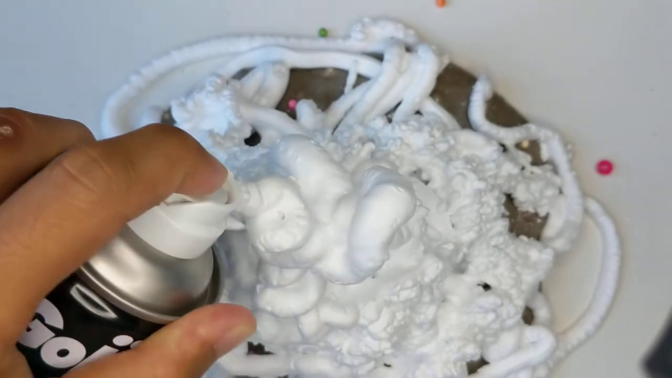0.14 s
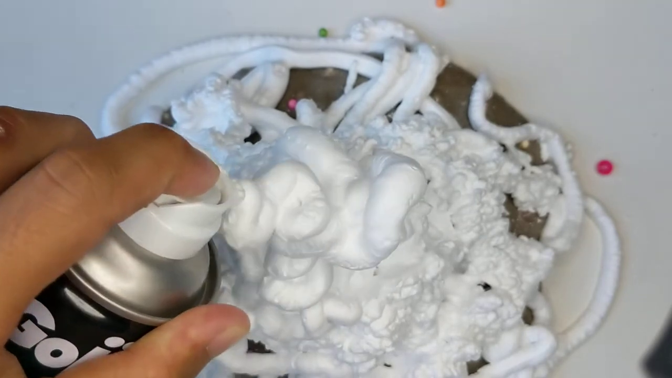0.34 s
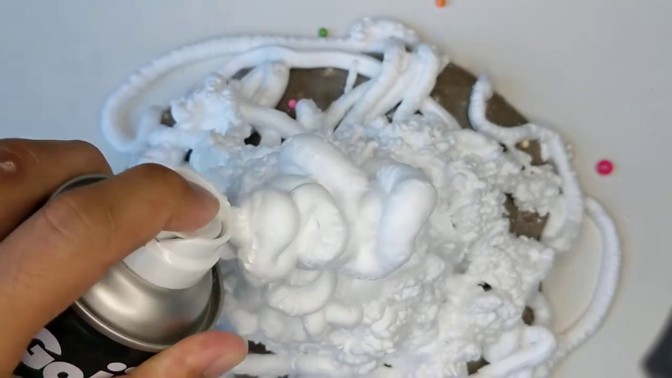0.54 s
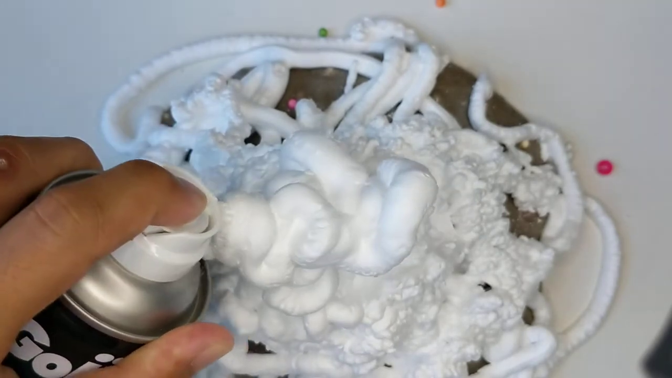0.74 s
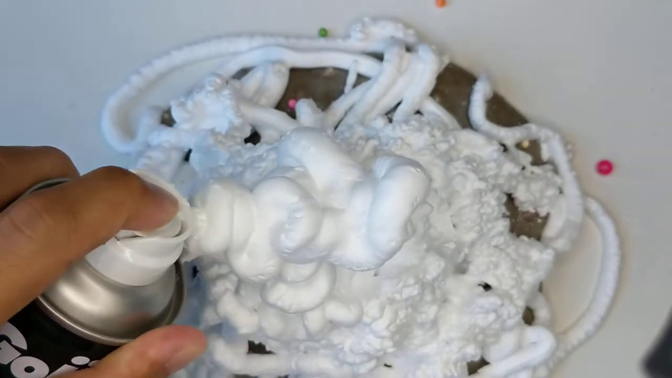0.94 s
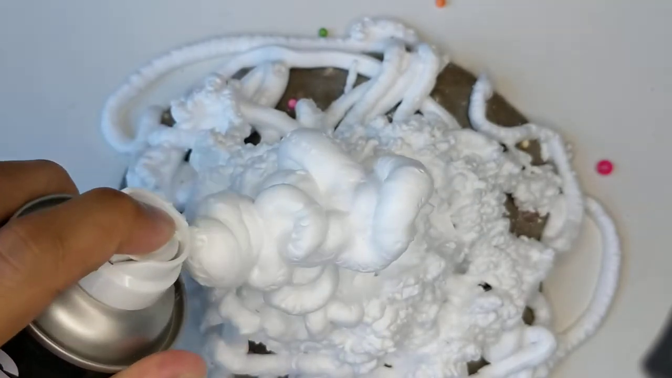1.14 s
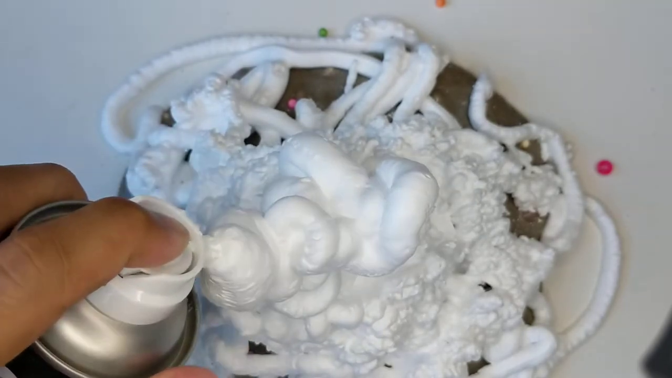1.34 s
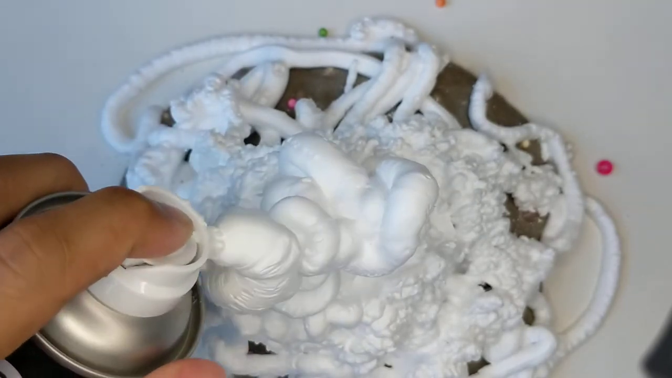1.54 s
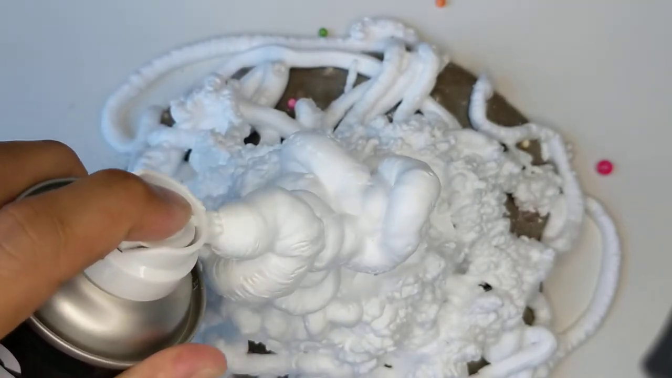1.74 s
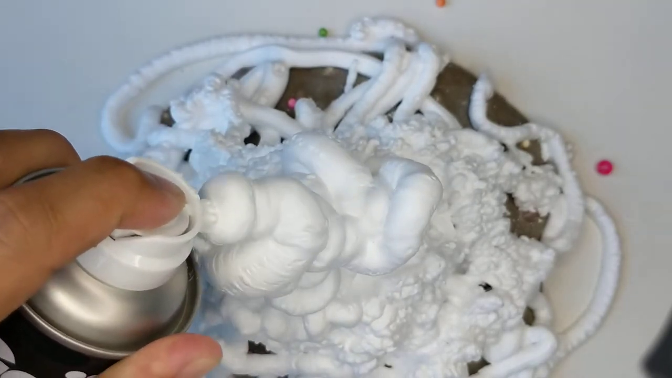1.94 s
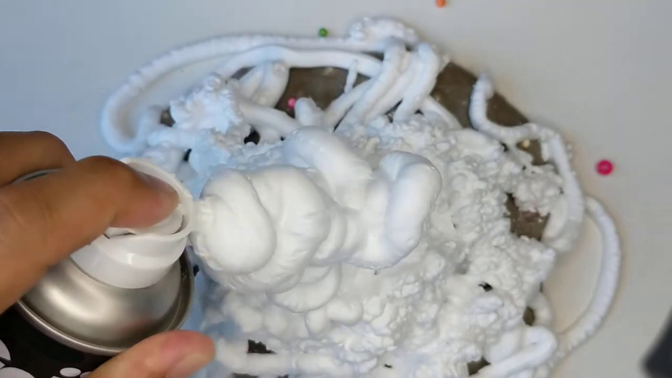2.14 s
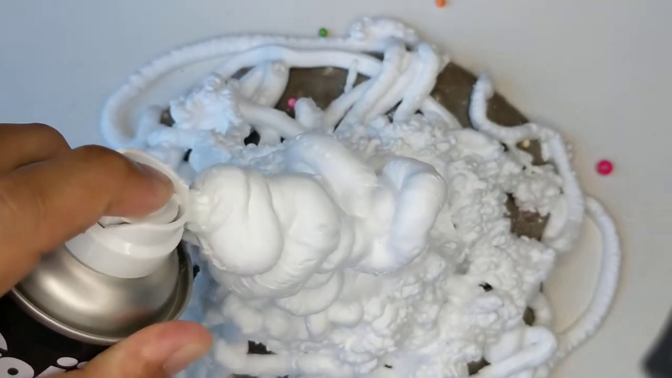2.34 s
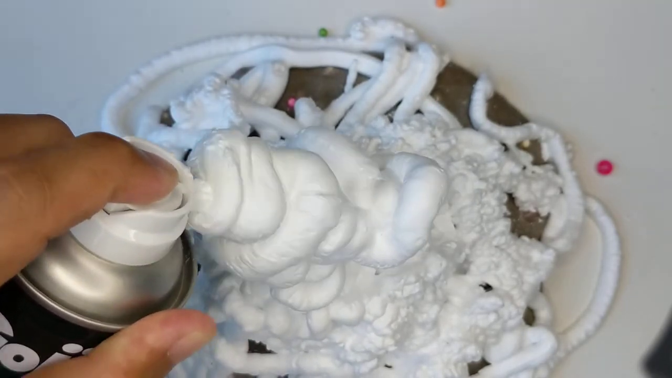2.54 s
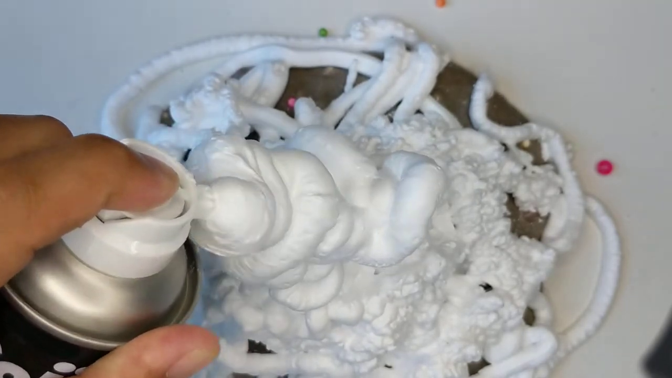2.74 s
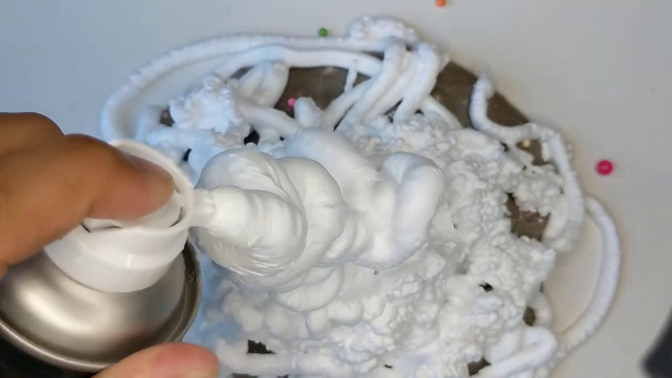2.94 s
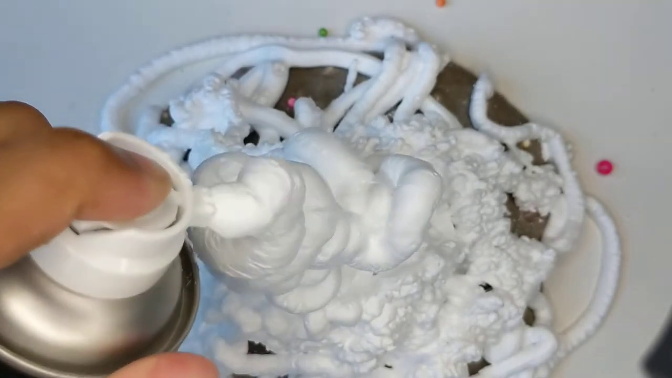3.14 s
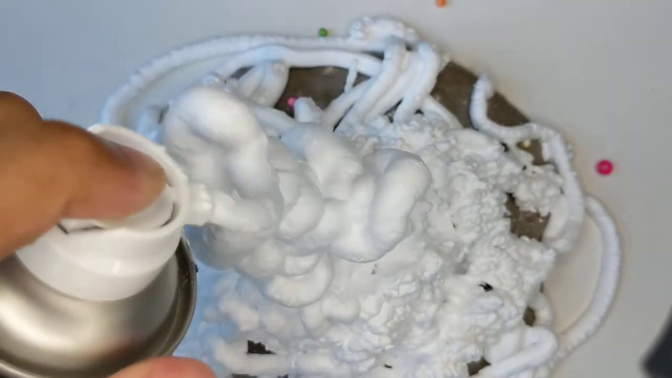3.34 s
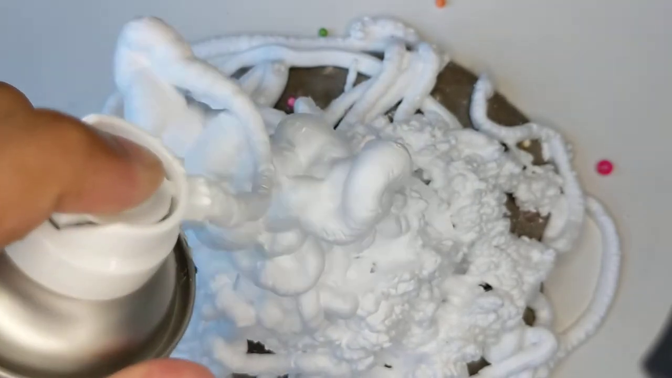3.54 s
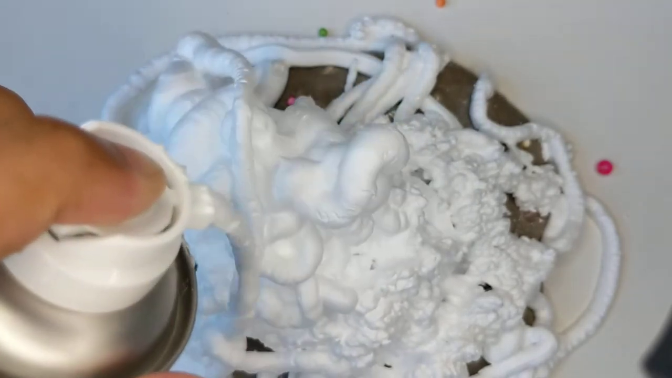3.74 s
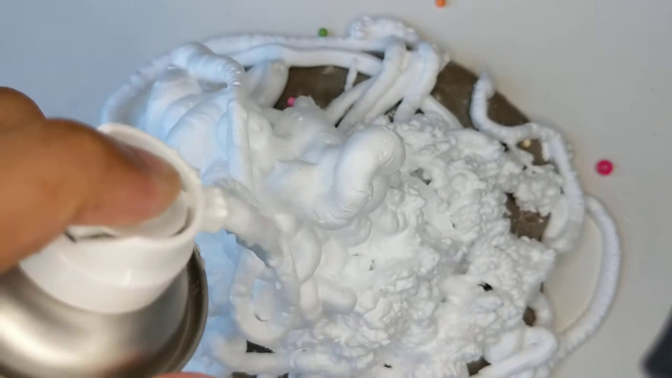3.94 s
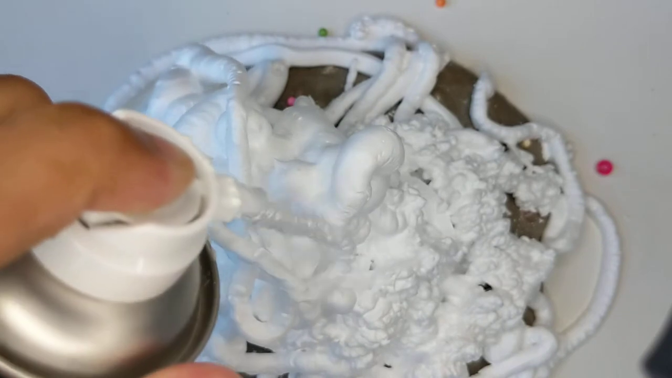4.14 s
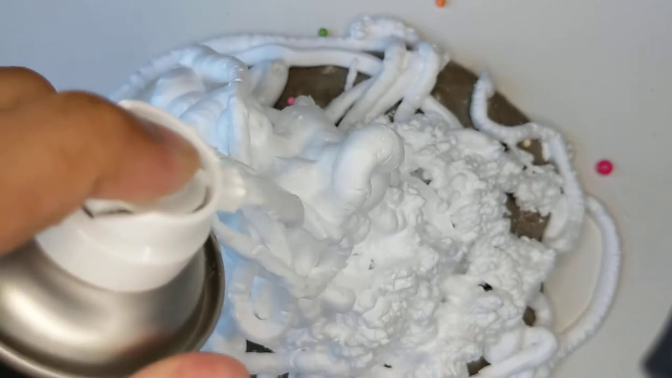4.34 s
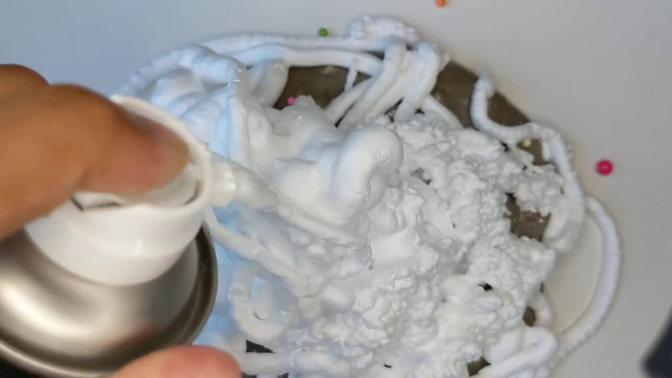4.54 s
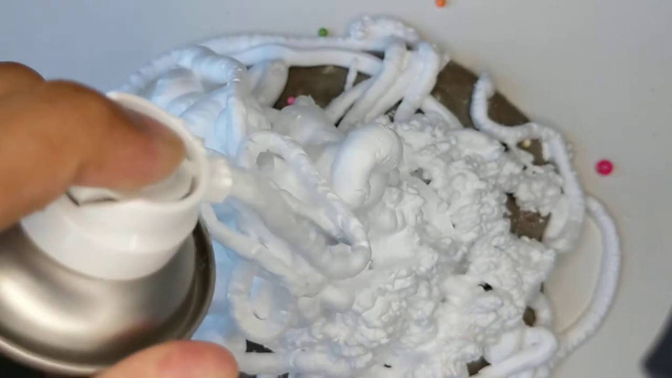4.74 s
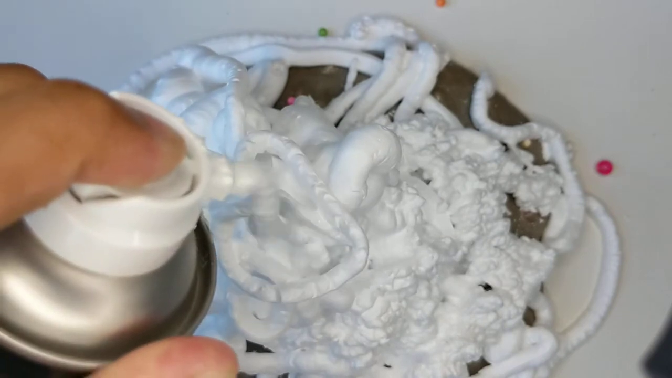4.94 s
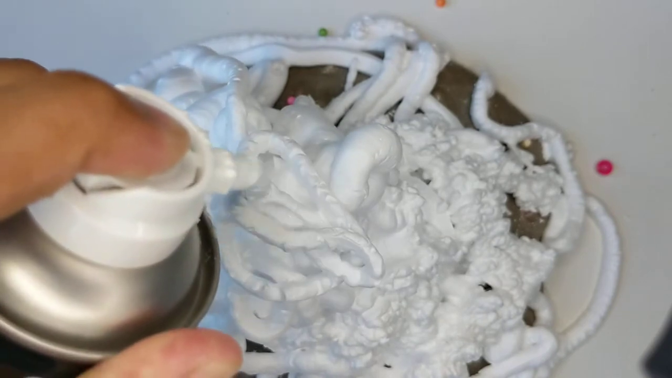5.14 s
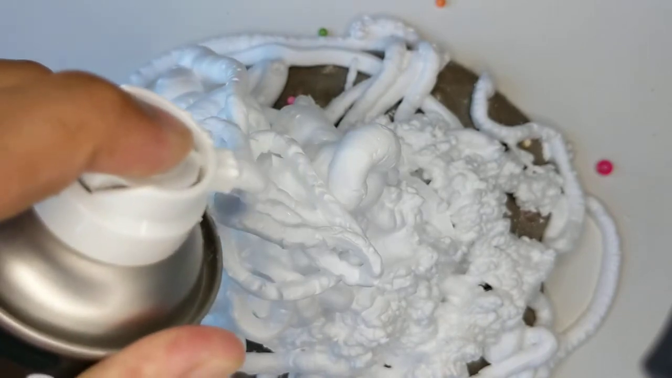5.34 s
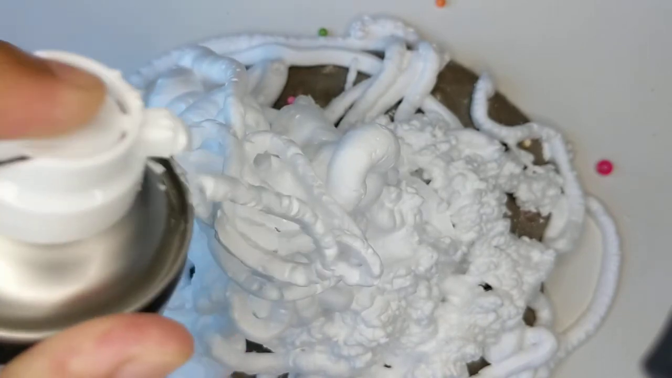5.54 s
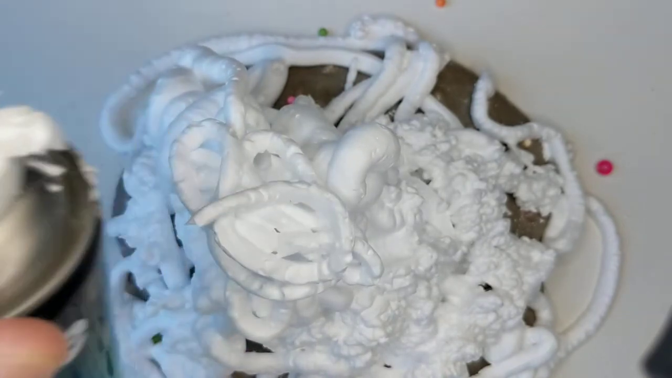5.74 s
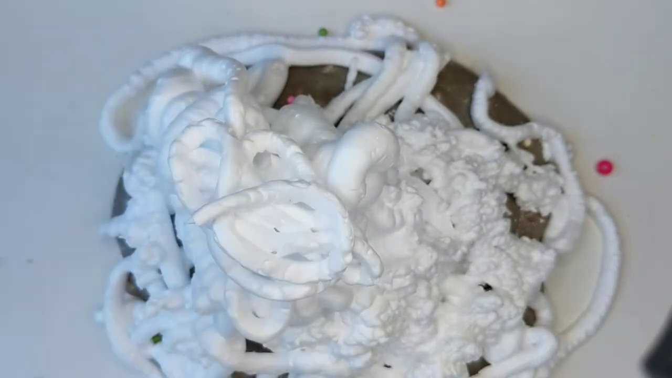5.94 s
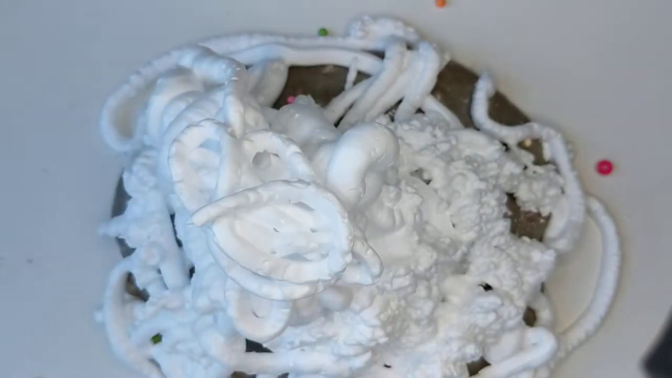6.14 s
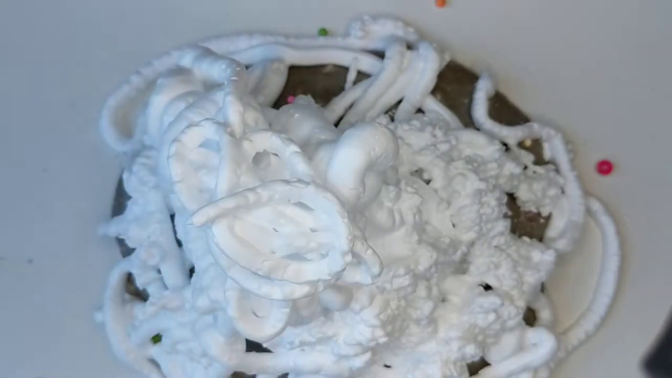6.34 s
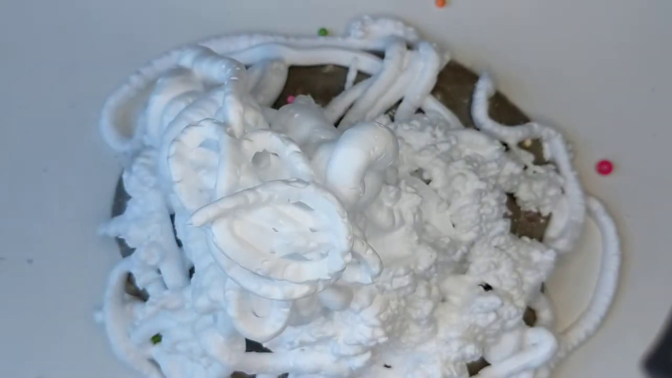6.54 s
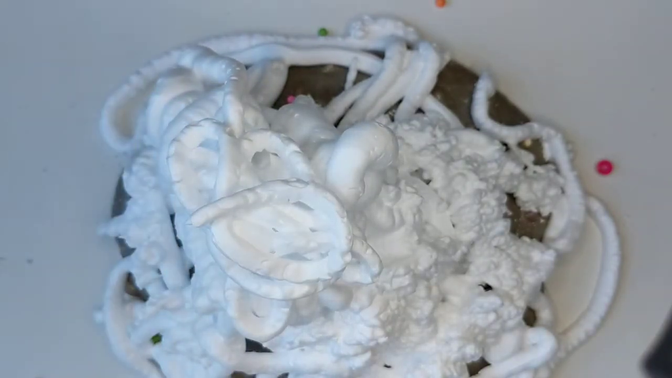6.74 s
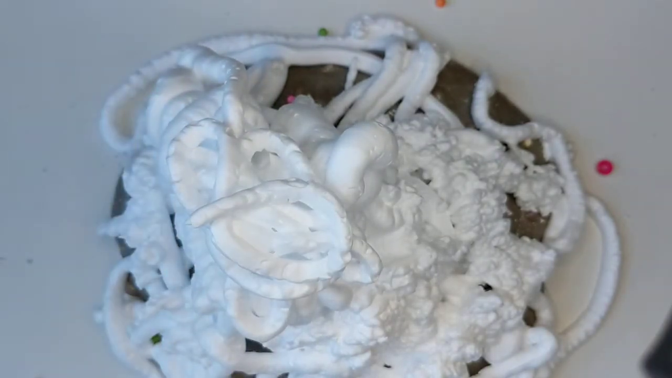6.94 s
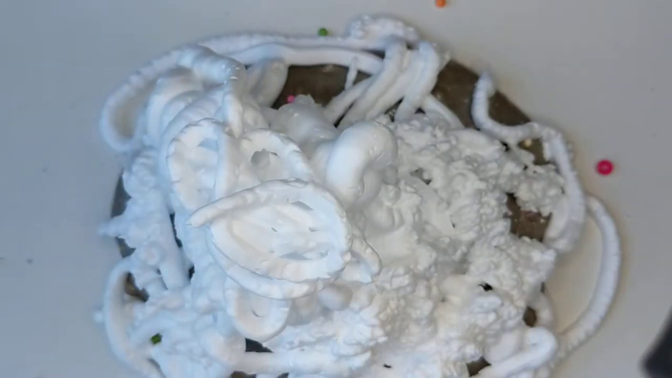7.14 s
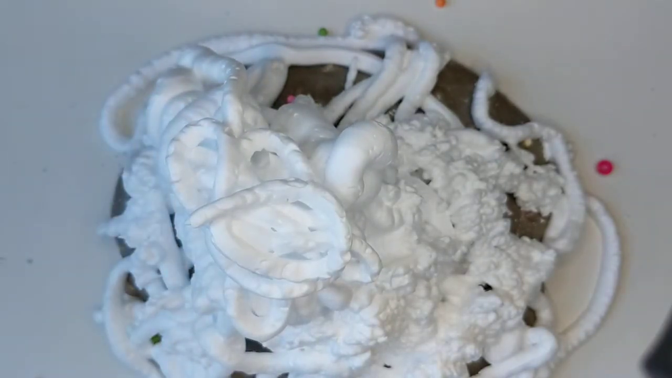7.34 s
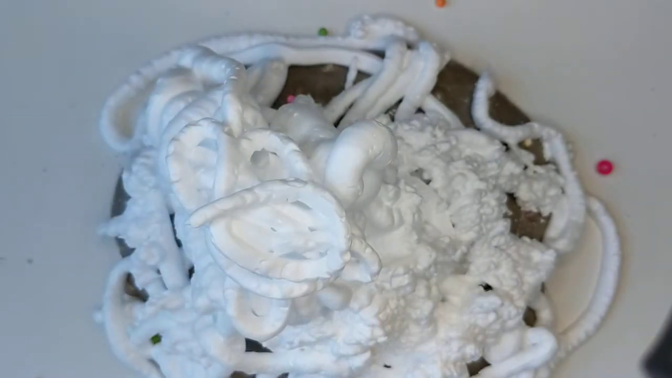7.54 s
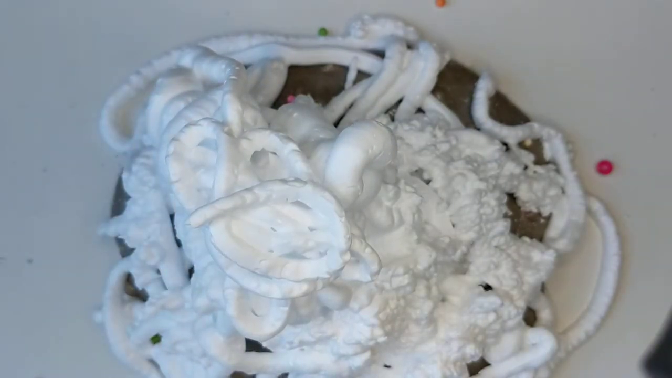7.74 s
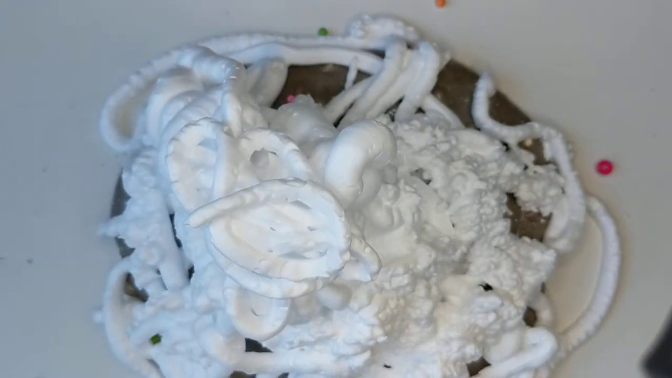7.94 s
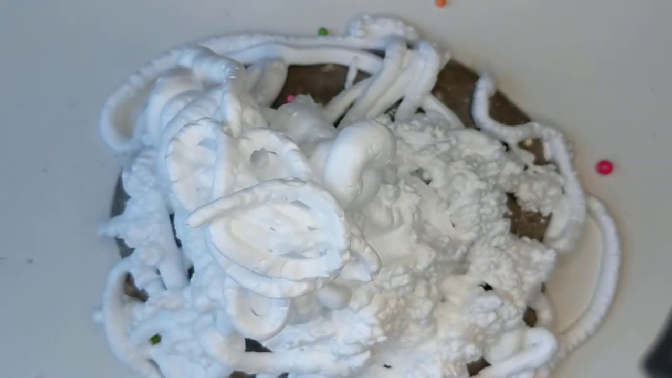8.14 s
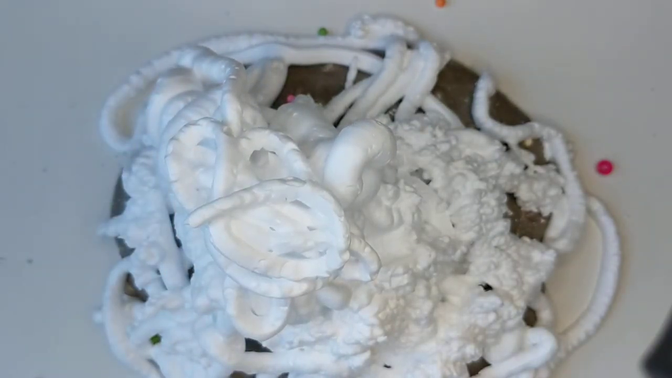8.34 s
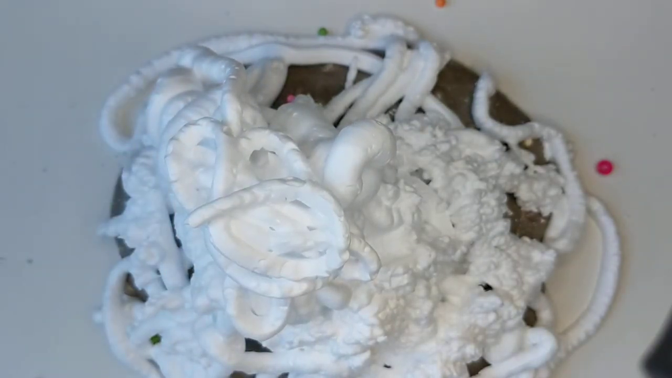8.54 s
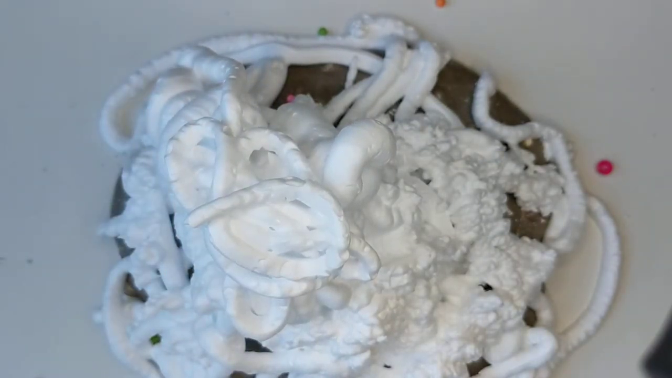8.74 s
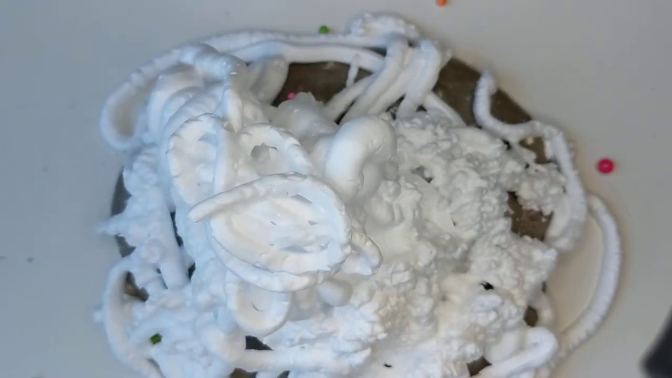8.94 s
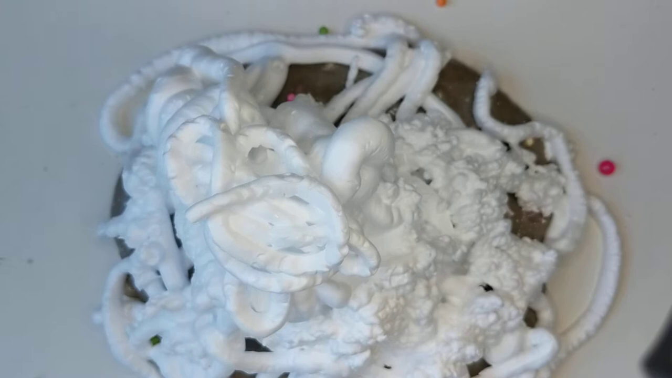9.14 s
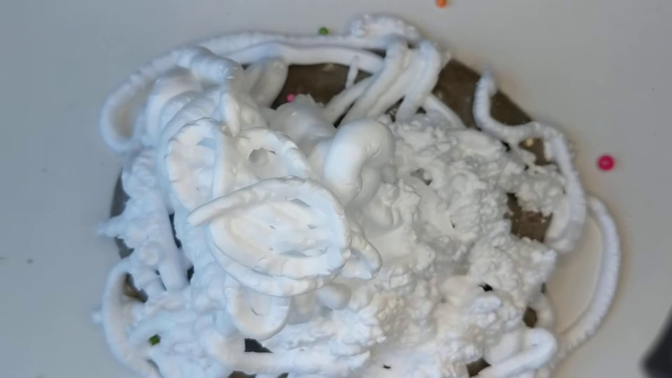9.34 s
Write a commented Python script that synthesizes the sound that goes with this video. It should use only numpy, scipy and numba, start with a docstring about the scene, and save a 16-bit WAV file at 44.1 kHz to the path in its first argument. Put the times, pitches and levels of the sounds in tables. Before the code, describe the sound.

Close up in a small room, an aerosol can hisses as shaving foam gurgles and crackles out of the spout, dotted with sharp bubble pops. A little past halfway the valve shuts, leaving low room noise with tiny squeaks and a few plastic ticks. Near the end the can lands with a short, dull rattling knock, followed by a light cloth rustle and soft thumps of a hand on the table.

```python
"""A small room: shaving foam is sprayed onto a heap on a table, close by.
Gas hisses at the valve; bubbles burst in the spout and ring it and the hollows of the growing blob.
The blob drops off and bares the spout; the valve shuts at 5.5 s. Then faint squeaks and plastic ticks,
the can is put down, cloth rustles and a hand thumps softly on the table."""
import sys
import numpy as np
from scipy import signal
from scipy.fft import rfft, irfft, next_fast_len
from scipy.io import wavfile
from scipy.ndimage import uniform_filter1d
from numba import njit

SR = 44100
rng = np.random.default_rng(int(sys.argv[2]) if len(sys.argv) > 2 else 0)


def pcm_store(signal):
    """Save signal as 16-bit PCM."""
    levels = np.round(np.clip(np.atleast_2d(signal), -1, 1) * 32767)
    wavfile.write(sys.argv[1], SR, levels.astype(np.int16).T)


N = 414085
JET_N = int(5.7 * SR)
T = np.arange(N) / SR

# room noise spectrum: (frequency [Hz], density [dB])
ROOM_SPECTRUM = [(15, -38), (25, -6.5), (194, -3), (435, -10), (525, -11), (766, -13), (1420, -18),
                 (1630, -19), (3860, -21.5), (5190, -22.5), (6440, -23.5), (8900, -27.5), (15700, -26)]
# spout coming bare of foam: (time [s], open share [0-1])
SPOUT_OPENING = [(0, 0.03), (2.75, 0.21), (3.1, 0.32), (3.4, 0.61), (5.15, 0.7), (5.3, 0.54), (5.6, 1)]
# valve resonances, main and above 10 kHz: (frequency [Hz], width [Hz], gain [dB])
HISS_MODES = [(7460, 1600, 5), (9460, 410, -0.5), (10000, 350, -11)]
HISS_TOP_MODES = [(10280, 390, 13.5), (11100, 520, 8), (12560, 550, 9), (13600, 1100, -17),
                  (16300, 3700, 1)]
# hiss above 10 kHz: (time [s], level [dB])
HISS_TOP_LEVELS = [(0, -65), (.9, -54), (1.3, -51), (2.1, -53), (3.14, -48), (3.6, -48.5), (5.5, -53)]
# foam flow: (time [s], sputter level [dB], rush level [dB])
FOAM_FLOW = [(0, -41.5, -36), (.3, -43.5, -37.5), (.46, -40, -37), (.74, -41, -37.5), (1.0, -42.5, -36),
             (1.12, -43, -37.5), (1.5, -44.5, -36.5), (1.9, -41.5, -36), (2.12, -37, -37),
             (2.3, -45, -36.5), (2.64, -44.5, -37.5), (3.14, -44.5, -35.5), (3.38, -41, -37),
             (4.05, -41, -38.5), (4.75, -42.5, -39), (4.92, -39, -38), (5.1, -43, -40), (5.27, -47, -41),
             (5.44, -41.5, -39.5), (5.5, -53, -49)]
# spout and foam resonances: (frequency [Hz], width [Hz], buried gain [dB], bare gain [dB])
SPOUT_MODES = [(3080, 990, 3.5, 2.5), (4144, 440, -0.5, 7), (4536, 660, 3, 6), (6480, 3900, -3.5, -15),
               (7080, 560, 4.5, 1), (8000, 1700, -15, -35)]
FOAM_MODES = [(703, 300, -10.5, 1.5), (961, 730, 1, -5), (1404, 930, 2.5, -3.5), (1704, 717, 3, 3.5),
              (2377, 510, -7.5, 0)]
# hollows in the foam: (time [s], duration [s], start pitch [Hz], end pitch [Hz], level [dB])
FOAM_HOLLOWS = [(0, .15, 2200, 2080, -37.5), (0, 0.91, 3290, 3200, -52), (0.064, 0.25, 7060, 6850, -44.5),
                (0.072, 0.37, 2285, 2060, -35.5), (0.202, 0.25, 2080, 1850, -37),
                (.31, 0.14, 4870, 4900, -41), (.333, 0.18, 7400, 7300, -46),
                (0.337, 0.38, 2360, 2420, -42.5), (0.412, 0.12, 2210, 2100, -38),
                (0.452, 0.26, 4950, 4780, -45), (0.522, 0.18, 1140, 1110, -41.5),
                (.53, 0.35, 1374, 1235, -41.5), (0.6, 0.34, 2180, 2100, -41),
                (0.702, 0.28, 1970, 1830, -45.5), (.72, 0.13, 2300, 2280, -42),
                (0.79, 0.36, 1214, 1066, -43.5), (.82, 0.31, 1690, 1540, -42), (.86, 0.21, 1930, 1800, -48),
                (0.893, 0.17, 6600, 6440, -42.5), (1.08, 0.44, 1556, 1424, -43),
                (1.12, 0.23, 1100, 1010, -46.5), (1.197, 0.19, 2330, 2150, -40.5),
                (1.343, 0.32, 2010, 1830, -44.5), (1.46, .2, 2260, 2170, -44),
                (1.498, 0.21, 1370, 1370, -42), (1.619, 0.27, 2230, 1790, -40.5),
                (1.768, 0.44, 1315, 1300, -44.5), (1.92, 0.14, 2320, 2190, -40),
                (1.922, 0.3, 2050, 1680, -46), (1.967, 0.21, 5200, 5200, -41),
                (2.2, 0.51, 1245, 1110, -42.5), (2.184, 0.41, 2160, 2150, -40.5),
                (2.31, 0.47, 4060, 3600, -47), (2.383, .36, 918, 920, -46), (2.386, 0.12, 5200, 5150, -43),
                (2.422, 0.31, 1970, 2020, -44.5), (2.545, 0.16, 5700, 5630, -42),
                (2.563, 0.33, 1500, 1440, -47.5), (2.68, .14, 5500, 5450, -48),
                (2.805, 0.52, 1880, 1780, -43), (2.88, 0.13, 5300, 5200, -46)]
# table under the spraying can: (frequency [Hz], width [Hz], gain [dB])
SHAKE_MODES = [(189, 20, -32), (239, 13.3, 10.5), (295, 78, 3), (350.5, 7.2, 3.5), (513, 40, 3)]
# big bubbles: (time [s], level [dB], thud offset [dB], crack pitch [Hz])
BIG_POPS = [(0.0154, -18.5, -19, 7140), (0.083, -36, -5, 7180), (0.099, -19, -19, 7430),
            (0.1717, -19, -16, 3010), (0.185, -33, -18, 7260), (0.2203, -11, -13, 7030),
            (0.276, -17.5, -11, 6450), (0.336, -25, -10, 4890), (0.4217, -12, -8, 7360),
            (0.476, -11, -9, 7200), (0.5263, -16.5, -4.5, 3320), (0.6804, -20, -4, 5110),
            (0.7043, -23, -13, 4780), (0.7239, -19, 0, 4820), (0.7672, -15.5, -14, 6800),
            (0.7953, -20, -16, 7460), (0.84, -30, -14, 6500), (0.8623, -23, -4, 6600),
            (0.8974, -21, -13, 4620), (0.92, -18, -12, 6470), (0.972, -14.5, -15, 6580),
            (1.0078, -16, -13, 6560), (1.03, -15, -6, 6610), (1.1922, -23, -5, 3380),
            (1.26, -30, -10, 3270), (1.3803, -23, -3, 7150), (1.488, -21, -13, 3000),
            (1.515, -14, -19, 7750), (1.548, -7, -28, 7340), (1.6182, -21, -9, 6960),
            (1.6748, -25, -4, 6170), (1.7624, -31, -8, 7490), (1.921, -31, -5, 7010),
            (1.9612, -15.5, -10, 6890), (2.0229, -16, -4.5, 4170), (2.0514, -14, -9, 4890),
            (2.1105, -12.5, -19, 3270), (2.2616, -20, -12, 6930), (2.2937, -18, -14, 6910),
            (2.3644, -38, -7, 4640), (2.384, -38.5, -8, 4490), (2.465, -26, -5, 3950),
            (2.485, -16, -18, 6360), (2.5032, -22, -12, 6160), (2.6513, -18.5, -8, 6050),
            (2.7182, -19, -14, 5500), (2.7393, -25, -15, 4770), (2.78, -18.5, -12, 5520),
            (2.8678, -16, -4.5, 4260), (2.9008, -30, -4, 6990), (2.933, -28, -8, 5260),
            (2.985, -31, -8, 4770), (3.255, -28, -4, 4270), (3.32, -20, 0.5, 4330),
            (3.359, -20.5, -19, 3070), (3.41, -24, -18, 4140), (3.4495, -21, -9, 3980),
            (3.4747, -19, -18, 4260), (3.5109, -29, -7, 4190), (3.536, -21.5, -5, 4230),
            (3.6127, -19, -6, 4220), (3.6402, -24, -14, 4420), (3.7015, -18, -9, 4230),
            (3.7207, -21.5, -3, 4470), (3.764, -18.5, -9, 4550), (3.811, -30, -5, 4550),
            (3.904, -27, -7, 4730), (3.9338, -22.5, -4, 4580), (3.9858, -31, -7, 4560),
            (4.0926, -31, -8, 4570), (4.1328, -16, -5, 4460), (4.1576, -15.5, -8, 4680),
            (4.2473, -23, 0.5, 4300), (4.297, -28, 2, 4620), (4.3168, -20, 0.5, 4330),
            (4.339, -25, -3, 4230), (4.4024, -21.5, -3, 4590), (4.4338, -17, -7, 4280),
            (4.472, -26, -4, 4220), (4.585, -20, -1.5, 4240), (4.6458, -21.5, -8, 4580),
            (4.661, -24, -8, 4550), (4.711, -20, 0, 4220), (4.754, -28, -6, 4160), (4.7871, -20.5, 2, 4590),
            (4.817, -17, -14, 3110), (4.888, -23, -8, 4310), (4.9036, -22, -5, 4600),
            (4.914, -21, -1, 4500), (4.917, -29, -3, 4600), (4.936, -29, 2, 4300), (4.969, -16, -8, 6500),
            (5.003, -19.5, -5, 4340), (5.022, -25, -2, 4160), (5.041, -31, 8, 4300), (5.065, -26, -1, 4350),
            (5.084, -25, -5, 4400), (5.107, -28, -8, 4300), (5.119, -25, -5, 4400), (5.165, -20, 1, 3060),
            (5.173, -33, 8, 3100), (5.1992, -25, -15, 7070), (5.3865, -24, -12, 4320),
            (5.4282, -19, -12, 6970), (5.449, -24, -8, 4410), (5.462, -21.5, -3, 7400),
            (5.514, -37, -1, 4300)]
# squelches: (time [s], peak over steady drive [dB])
SQUELCH_PEAKS = [(0.019, 14), (0.182, 1), (0.205, 4.5), (0.3351, -11), (0.4209, 4), (0.474, 9), (0.6776, 4),
                 (0.7243, -1), (0.765, 7), (0.796, 8), (0.8624, -8), (1.0859, -5), (1.216, 5.5),
                 (1.3823, 0), (1.503, 12), (1.5466, -11), (1.6746, -3), (1.7619, 3), (2.2623, -1),
                 (2.294, 5), (2.945, -1), (3.0649, -1), (3.192, 4), (3.322, -9), (3.765, 12), (3.93, 3),
                 (4.16, -1), (4.27, 8), (4.32, -1), (4.712, 7), (4.787, -9.5), (4.905, 10), (4.97, 8),
                 (5.165, 7), (5.425, 3)]
# bands the cap absorbs: (frequency [Hz], width [Hz], depth [0-1])
CAP_NOTCHES = [(2690, 280, .7), (3450, 400, .4)]
# plastic ticks: (time [s], level [dB], ring pitch [Hz], ring offset [dB])
PLASTIC_TICKS = [(5.658, -48, 2550, 2.5), (6.629, -47, 7260, -20), (8.295, -45, 1080, 3),
                 (8.297, -43, 4700, -1), (8.302, -50, 4650, 2), (8.716, -34.5, 5800, -1),
                 (8.957, -44, 3550, -10)]
# one-pitch squeaks: (time [s], level [dB], pitch [Hz])
THIN_SQUEAKS = [(5.6585, -65, 6500), (5.736, -63.5, 6440), (5.798, -72, 6500), (5.852, -68, 6560),
                (6.214, -70, 4080), (6.936, -66, 6350), (7.007, -66, 6350), (7.274, -69, 6350),
                (7.17, -71, 6500), (7.341, -70, 6430), (7.55, -80, 6500), (7.62, -73, 6450),
                (7.689, -69, 6400), (7.81, -72, 6450), (7.886, -72, 4120), (8.236, -67, 4150),
                (8.346, -59, 3320), (8.379, -64, 3930), (8.37, -68, 5000), (8.594, -65, 6430),
                (8.634, -58, 6400), (8.66, -62, 2900), (9.266, -60, 6400)]
# four-pitch squeaks: (time [s], then a level [dB] per SQUEAK_HZ)
CHORD_SQUEAKS = [(6.026, -62, -75, -71, -70), (6.149, -61, -75, -66, -80), (6.309, -64, -66, -68, -72),
                 (6.485, -65, -64.5, -64, -74), (6.679, -67, -69, -66, -68), (6.866, -64, -64, -69, -70),
                 (7.05, -65, -70, -68, -74), (7.274, -68, -65, -76, -78), (7.451, -63, -71, -69, -74),
                 (7.716, -63, -65, -81, -68), (7.996, -69, -82, -80, -76), (9.028, -74, -60, -62, -77),
                 (9.313, -60, -62, -66, -66)]
SQUEAK_HZ = (5100, 2780, 5950, 4140)
# can landing: (time [s], level [dB], rattle t60 [s])
CAN_KNOCKS = [(8.023, -18, 0.31), (8.033, -25, 0.055), (8.151, -42, .06), (8.294, -50, .1),
              (8.325, -47, 0.083)]
# can body: (frequency [Hz], width [Hz], gain [dB])
CAN_MODES = [(458, 110, -9), (916, 170, 14), (1300, 160, 15), (1496, 150, 18), (1560, 60, 4),
             (2060, 180, -6), (2380, 240, -13), (3250, 400, -18)]
# rustle envelope: (time [s], level [dB])
RUSTLE_LEVELS = [(8.1, -56), (8.286, -59), (8.304, -43), (8.33, -52), (8.49, -64.5), (8.71, -51),
                 (8.85, -58.5), (8.964, -49), (9.236, -57), (9.39, -52.5)]
# cloth spectrum: (frequency [Hz], density [dB])
CLOTH_SPECTRUM = [(180, 5), (300, 2.5), (1020, -2.5), (1730, -4), (1910, -5.5), (3270, -7), (4120, -11),
                  (6400, -8), (15000, -25)]
# table trembling: (time [s], level [dB])
RUMBLE_LEVELS = [(8.55, -86), (8.746, -79), (9.11, -59), (9.39, -63)]
# hand on the table: (time [s], level [dB], overtone offset [dB])
HAND_THUMPS = [(9.045, -39, -25), (9.125, -29, -10.5), (9.199, -66, 3), (9.301, -33, -11)]
# table top: (frequency [Hz], gain [dB], t60 [s])
TABLE_MODES = [(111, -11.5, 0.11), (231, -15.5, 0.32), (350, -17.5, 0.12), (510, -28, 0.16),
               (706, -8.5, 0.023)]

SHUT_S, HISS_DB = 5.51, -48.5
BARE_SHARE = np.interp(T[:JET_N], *np.transpose(SPOUT_OPENING))


def undb(db):
    return 10 ** (np.asarray(db) / 20)


def unit(x):
    return x / np.sqrt(np.mean(x ** 2))


def add(out, time_s, x):
    i = int(time_s * SR)
    out[i:i + len(x)] += x[:len(out) - i]


def butter(x, order, hz, kind):
    return signal.sosfilt(signal.butter(order, hz, kind, fs=SR, output="sos"), x)


def band(x, hz, width_hz):
    return signal.lfilter(*signal.iirpeak(hz, hz / width_hz, fs=SR), x)


@njit
def moving_band(x, hz, width_hz):
    """State-variable band-pass, gain 1 at its moving centre."""
    y, band_state, low_state = np.empty(len(x)), 0., 0.
    for i in range(len(x)):
        g, damping = np.tan(np.pi * hz[i] / SR), width_hz / hz[i]
        v = (band_state + g * (x[i] - low_state)) / (1 + g * (g + damping))
        band_state, low_state = 2 * v - band_state, low_state + 2 * g * v
        y[i] = damping * v
    return y


def resonate(x, modes):
    """Parallel resonances."""
    return sum(undb(db) * band(x, hz, width_hz) for hz, width_hz, db in modes)


def spout_filter(x, modes):
    """Steep resonances of alternating sign; gains shift as the spout comes bare."""
    out = np.zeros(JET_N)
    for k, (hz, width_hz, buried_db, bare_db) in enumerate(modes):
        gain = undb(buried_db + BARE_SHARE * (bare_db - buried_db))
        out += (-1) ** k * gain * band(band(x, hz, width_hz), hz, 2 * width_hz)
    return out


def shaped_noise(spectrum):
    """Noise of rms 1 with the given spectrum."""
    hz, db = np.transpose(spectrum)
    size = next_fast_len(N)
    bins_hz = np.arange(size // 2 + 1) * SR / size + 1
    gain = undb(np.interp(np.log(bins_hz), np.log(hz), db))
    return unit(irfft(rfft(rng.standard_normal(size)) * gain, size)[:N])


def wander(rate_hz, size=JET_N):
    """Slewed random steps, spread near 1."""
    hold = int(SR / rate_hz)
    steps = np.repeat(rng.standard_normal(N // hold + 1), hold)
    return unit(uniform_filter1d(steps, hold)[:N])[:size]


def curve(table, column=1, size=JET_N, outside_db=None):
    rows = np.array(table)
    return np.interp(T[:size], rows[:, 0], rows[:, column], left=outside_db, right=outside_db)


def room_noise():
    """Low, slowly wavering background."""
    return undb(-64 + .65 * wander(5.6, N)) * shaped_noise(ROOM_SPECTRUM)


def bubbles(rate_hz, scatter_db, surge_db, air):
    """Random bursts, a few of them big, in surges over turbulent noise."""
    fires = rng.random(JET_N) < rate_hz / SR
    size_db = scatter_db * np.minimum(rng.exponential(size=JET_N), 5)
    clicks = fires * undb(size_db) * rng.standard_normal(JET_N)
    surging = unit(clicks * undb(surge_db * wander(35)))
    return unit(surging + air * rng.standard_normal(JET_N))


def valve_hiss(fizz):
    """Turbulent gas and a little fizz ring the valve."""
    gas = rng.standard_normal(JET_N) * undb(.5 * wander(30)) + .17 * fizz
    main = undb(HISS_DB + 1.9 * wander(9)) * unit(resonate(gas, HISS_MODES))
    top = undb(curve(HISS_TOP_LEVELS) + .34 * wander(6.6)) * unit(resonate(gas, HISS_TOP_MODES))
    return main + top


def sputter(fizz, surge):
    """Tiny bursts ring the spout."""
    return undb(curve(FOAM_FLOW) + .29 * surge) * unit(spout_filter(fizz, SPOUT_MODES))


def foam_rush(wet, gurgle, surge):
    """Gurgle rings the lowest foam resonance, wet crackle the rest."""
    rush = spout_filter(wet, FOAM_MODES[1:]) + spout_filter(gurgle, FOAM_MODES[:1])
    return undb(curve(FOAM_FLOW, 2) - 4 + .37 * surge) * unit(rush)


def hollows(drive, fade_s=.06):
    """Each hollow opens, rings on the bubbling while its pitch glides, mostly down, and closes."""
    out, waver = np.zeros(JET_N), 1 + .013 * wander(25)
    for time_s, length_s, start_hz, end_hz, db in FOAM_HOLLOWS:
        span = slice(int(time_s * SR), int((time_s + length_s) * SR))
        x, width_hz = drive[span], 74 * (start_hz / 1000) ** 1.3
        glide_hz = np.linspace(start_hz, end_hz, len(x)) * waver[span]
        tone = moving_band(moving_band(x, glide_hz, width_hz), glide_hz, 2 * width_hz)
        makeup = np.sqrt(SR / width_hz / np.pi)
        window = signal.windows.tukey(len(x), min(2 * fade_s / length_s, 1))
        add(out, time_s, undb(db) * makeup * tone * window)
    return out


def table_shake(wet):
    """The spray shakes the table, less once the spout is bare."""
    return undb(HISS_DB - 6.5 - 9.4 * BARE_SHARE) * unit(band(resonate(wet, SHAKE_MODES), 498, 470))


def spray():
    """Gas and foam flow until the finger lets go; the last gas dribbles out."""
    shut_for_s = np.maximum(T[:JET_N] - SHUT_S, 0)
    jet, dribble = undb(-1100 * shut_for_s), undb(-23 - 140 * shut_for_s)
    surge, push = wander(14), squelches()
    spits = bubbles(rate_hz=330, scatter_db=1.3, surge_db=.7, air=0)
    fizz = bubbles(rate_hz=2500, scatter_db=2.5, surge_db=2.5, air=.4) + (.3 + .9 * BARE_SHARE) * spits
    crackle = bubbles(rate_hz=900, scatter_db=1.5, surge_db=0, air=.48)
    spatter = bubbles(rate_hz=70, scatter_db=2, surge_db=1.5, air=0)
    gurgle = bubbles(rate_hz=1500, scatter_db=2.5, surge_db=1.2, air=.5)
    wet = unit(fizz + .71 * crackle + .4 * BARE_SHARE * spatter)
    bubbling = unit(gurgle + .4 * fizz + rng.standard_normal(JET_N))
    flow = valve_hiss(fizz) + sputter(fizz, surge)
    flow += foam_rush(wet * push ** .11, gurgle, surge) + table_shake(wet)
    return np.maximum(jet, dribble) * flow + hollows(push * bubbling)


def small_pops(count=260, buried_hz=6800, bare_hz=4600):
    """Random rows like BIG_POPS; denser and lower as the spout comes bare."""
    time_s = (SHUT_S - .05) * rng.random(count) ** .7
    bare = np.interp(time_s, *np.transpose(SPOUT_OPENING))
    size, detune = rng.standard_normal((2, count))
    hz = (buried_hz + bare * (bare_hz - buried_hz)) * (1 + .18 * (1 - bare) * detune)
    return list(zip(time_s, -29.5 + 2.5 * size, np.full(count, -4.5), hz))


def pops(onset_delay_s=.001, bounce_s=.0022):
    """Each bubble snaps, cracks in the spout at its own pitch and thuds in the foam."""
    crack, thud, direct = np.zeros((3, JET_N))
    for time_s, db, thud_db, hz in small_pops() + BIG_POPS:
        puff = .15 * rng.standard_normal(200) * np.exp(-T[:200] / .002)
        puff[0] = 1
        snap = band(band(band(puff, hz, 2600), hz, 4000), hz, 5000)
        onset_s = time_s + onset_delay_s
        add(crack, onset_s, undb(db) * snap / np.linalg.norm(snap))
        add(thud, onset_s, undb(db + thud_db) * puff)
        add(direct, onset_s, undb(db) * puff)
    muffle_db = -7.5 * (1.5 - BARE_SHARE)  # foam over the spout
    burst = undb(15 + muffle_db) * butter(direct, 4, (1500, 7800), "band")
    burst += spout_filter(crack, SPOUT_MODES) + undb(-14.5) * crack
    burst += undb(18) * spout_filter(thud, FOAM_MODES[2:])
    return burst + undb(-19) * np.roll(burst, int(bounce_s * SR))  # bounce off the table


def squelches(rise_s=.0026):
    """Gain on the foam's drive: 1, plus a brief push per squelch."""
    push, age = np.ones(JET_N), T[:900] / rise_s
    for time_s, db in SQUELCH_PEAKS:
        add(push, time_s, undb(db) * age * np.exp(1 - age))
    return push


def cap(jet):
    """The cap absorbs narrow bands, more once the spout is bare."""
    for hz, width_hz, depth in CAP_NOTCHES:
        jet = jet - depth * np.minimum(BARE_SHARE + .35, 1) * band(jet, hz, width_hz)
    return jet


def ticks():
    """Dry plastic snaps with a brief ring."""
    out, t = np.zeros(N), T[:SR // 3]
    snap_envelope = np.exp(-t / .0027) + .38 * np.exp(-t / .074)
    ring_envelope = t / .0033 * np.exp(1 - t / .0011) + .28 * np.exp(-t / .0086)
    for time_s, db, hz, ring_db in PLASTIC_TICKS:
        snap = band(rng.standard_normal(len(t)) * snap_envelope, 6000, 3700)
        ring = undb(ring_db) * np.sin(2 * np.pi * hz * t) * ring_envelope
        add(out, time_s, undb(db) * (.5 * snap + ring))
    return out


def whistle(hz, length_s=.09, rise_s=.013):
    """Wavering tone plus narrow noise; fast rise, slower fade."""
    size = int(length_s * SR)
    jitter, air = rng.standard_normal((2, 5000))
    pitch_hz = hz * (1 + .014 * unit(uniform_filter1d(jitter, 500)))
    rasp = .55 * np.sin(2 * np.pi * np.cumsum(pitch_hz) / SR) + .45 * unit(band(air, hz, 380))
    age = T[:size] / rise_s
    return rasp[-size:] * age * np.exp(1 - age)


def squeaks():
    """Faint whistles, single or on four pitches that enter unevenly."""
    out = np.zeros(N)
    for time_s, db, hz in THIN_SQUEAKS:
        add(out, time_s, undb(db) * whistle(hz))
    for time_s, *levels_db in CHORD_SQUEAKS:
        for hz, db in zip(SQUEAK_HZ, levels_db):
            late_s = .02 * rng.random() ** 2
            add(out, time_s + late_s, undb(db) * whistle(hz * rng.uniform(.98, 1.02)))
    return out


def can_knocks():
    """The can lands: its dull body rings and rattles, its rim clicks."""
    out, t = np.zeros(N), T[:SR // 2]
    for time_s, db, t60_s in CAN_KNOCKS:
        force = .034 * rng.standard_normal(len(t)) * 1000 ** (-t / t60_s)  # rattle
        force[:40] -= .27 * np.hanning(40)  # blow
        body = band(resonate(force, CAN_MODES), 910, 2400)
        rim = undb(-31) * band(rng.standard_normal(len(t)), 5000, 6000) * np.exp(-t / .0041)
        add(out, time_s, undb(db) * (body / np.abs(body).max() + rim))
    return out


def rustle():
    """Cloth noise with a flickering level."""
    level_db = curve(RUSTLE_LEVELS, size=N, outside_db=-120) - 7.5 + 2.9 * wander(40, N)
    return undb(level_db) * shaped_noise(CLOTH_SPECTRUM)


def table_rumble():
    """The table trembles under a hand."""
    tremble = unit(band(band(rng.standard_normal(N), 91, 50), 95, 80))
    return undb(curve(RUMBLE_LEVELS, size=N, outside_db=-120)) * tremble


def table_thumps(rise_s=.0016):
    """A soft hand lands gradually and rings the table top."""
    out, t = np.zeros(N), T[:SR // 2]
    lowest_hz, attack = TABLE_MODES[0][0], 1 - np.exp(-t / rise_s)
    for time_s, db, overtone_db in HAND_THUMPS:
        ring = np.zeros(len(t))
        for hz, mode_db, t60_s in TABLE_MODES:
            gain = undb(mode_db + overtone_db * (hz > lowest_hz))
            ring += gain * np.sin(2 * np.pi * hz * t) * 1000 ** (-t / t60_s)
        add(out, time_s, undb(db) * attack * ring / np.abs(ring).max())
    return out


def walls(x, t60_s=.31, delay_s=.004):
    """Diffuse echo of the small room."""
    t = T[:SR // 2]
    echo = band(rng.standard_normal(len(t)), 1420, 11100) * 1000 ** (-t / t60_s) * (t > delay_s)
    return signal.fftconvolve(x, echo / np.linalg.norm(echo))[:N]


def scene():
    foam = np.pad(cap(spray() + pops()), (0, N - JET_N))
    near = foam + ticks() + squeaks()
    far = butter(can_knocks() + table_thumps(), 4, 75, "high")  # the knocks and thumps are cut below about 75 Hz
    echo = walls(undb(-7) * near + far)  # less echo for close sources
    return (near + far + undb(-6.5) * echo + rustle() + table_rumble() + room_noise())[None]


def record(dry, low_hz=35, top_hz=15750):
    """The phone drops the deepest bass and cuts the top."""
    dry = butter(dry, 2, low_hz, "high")
    return signal.sosfilt(signal.ellip(14, .2, 80, top_hz, fs=SR, output="sos"), dry)


dry = scene()
out = record(dry)
pcm_store(out)
```